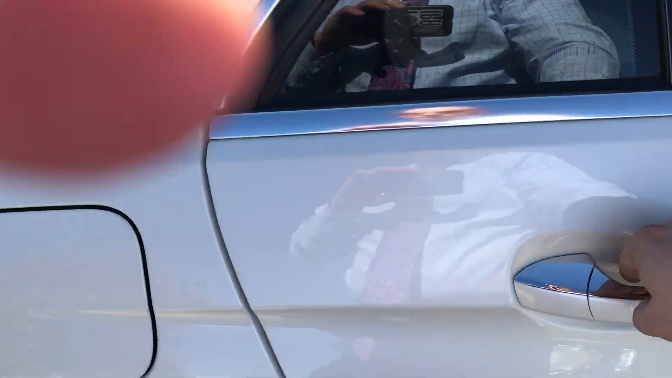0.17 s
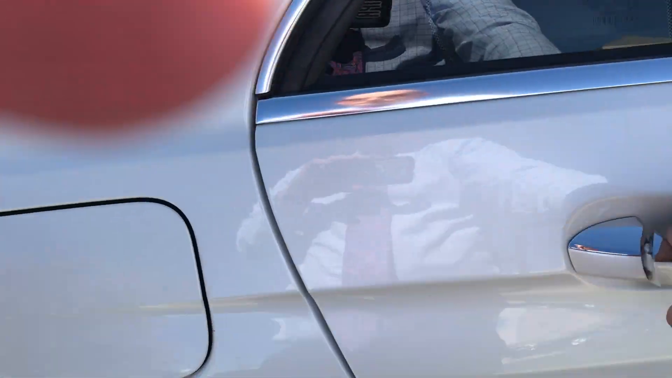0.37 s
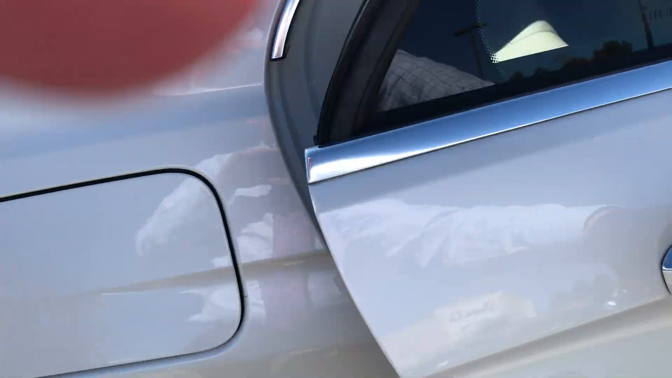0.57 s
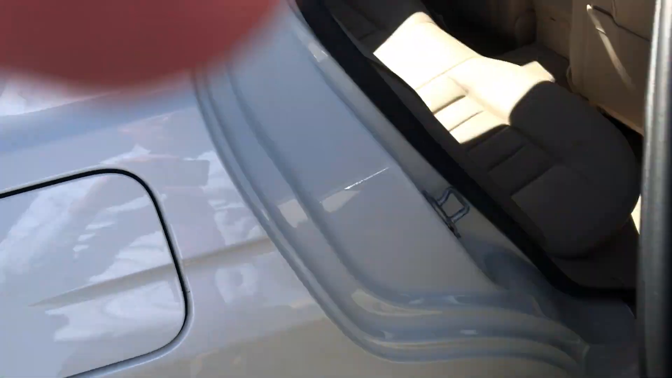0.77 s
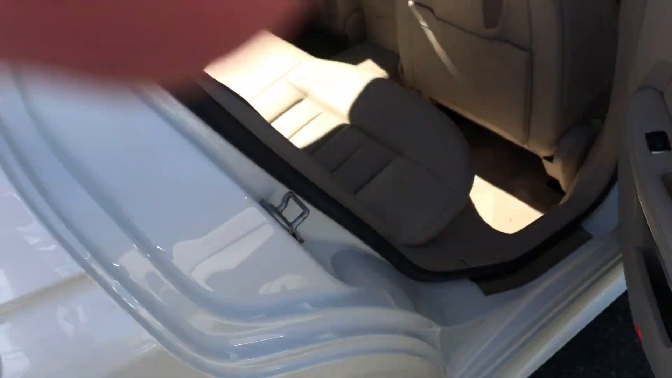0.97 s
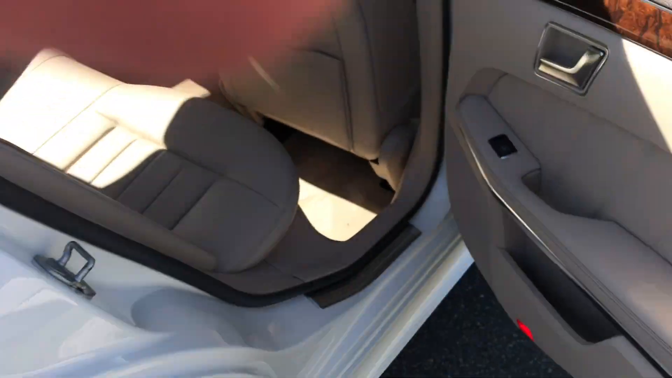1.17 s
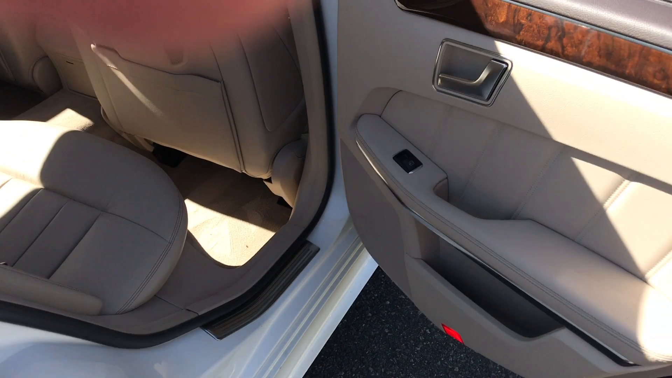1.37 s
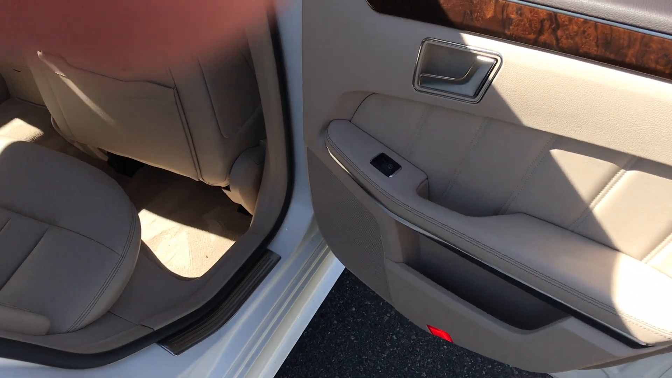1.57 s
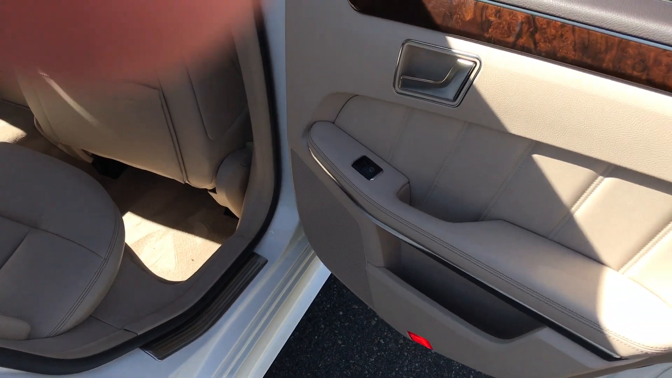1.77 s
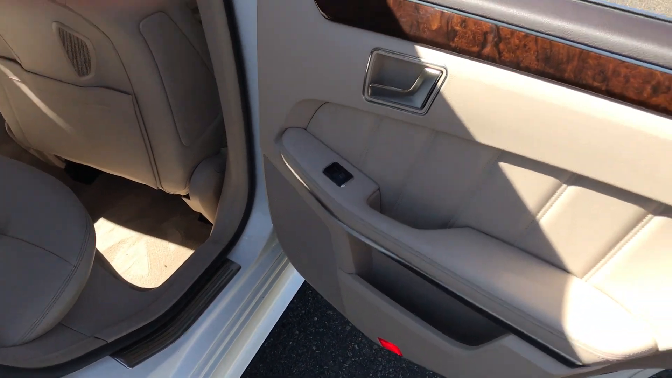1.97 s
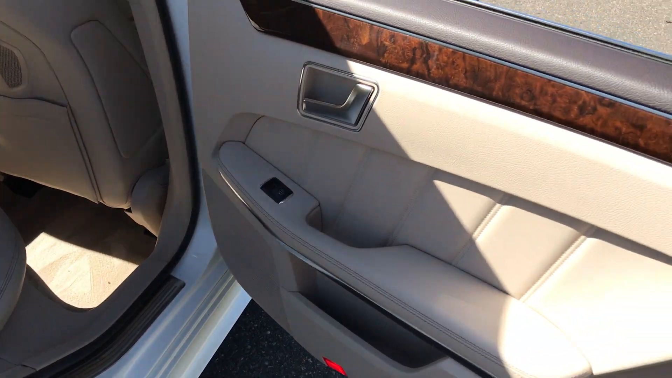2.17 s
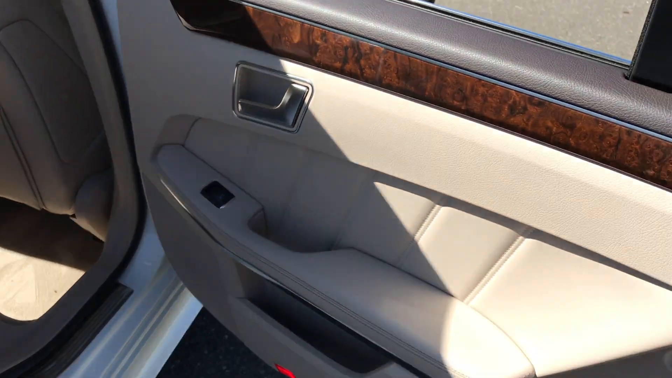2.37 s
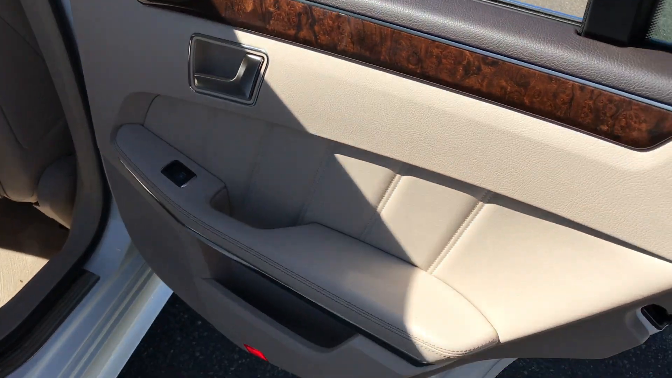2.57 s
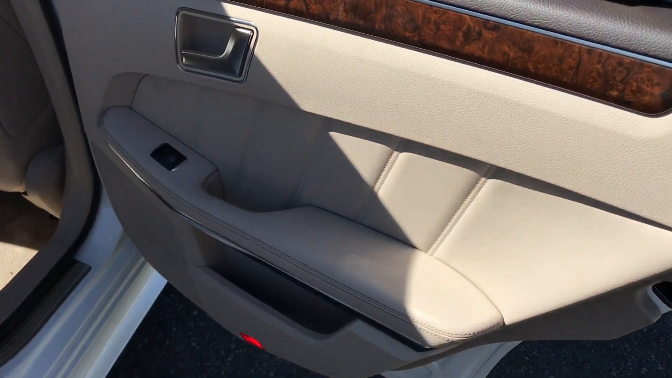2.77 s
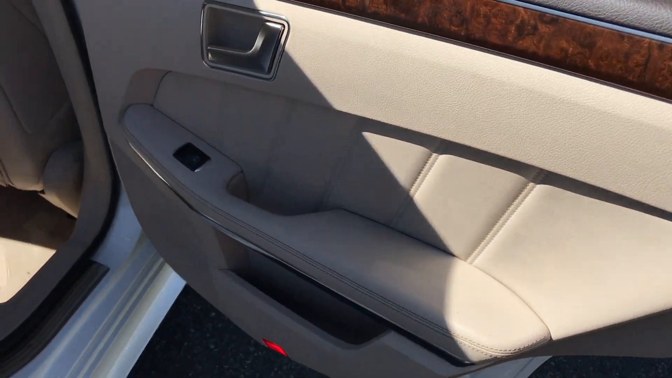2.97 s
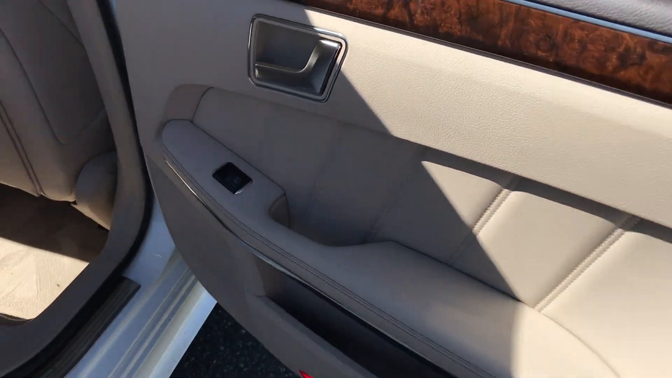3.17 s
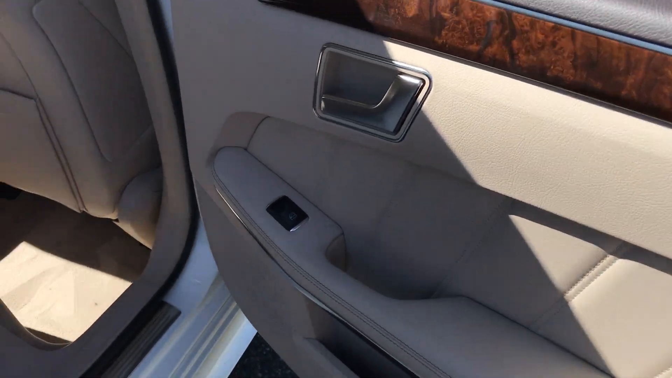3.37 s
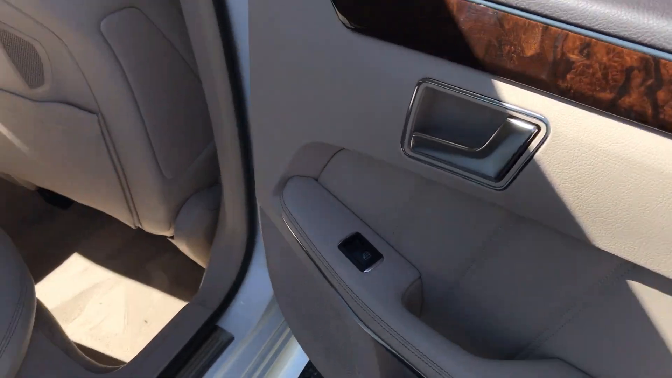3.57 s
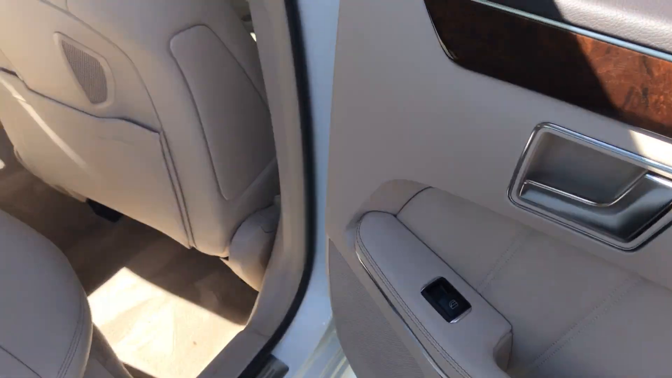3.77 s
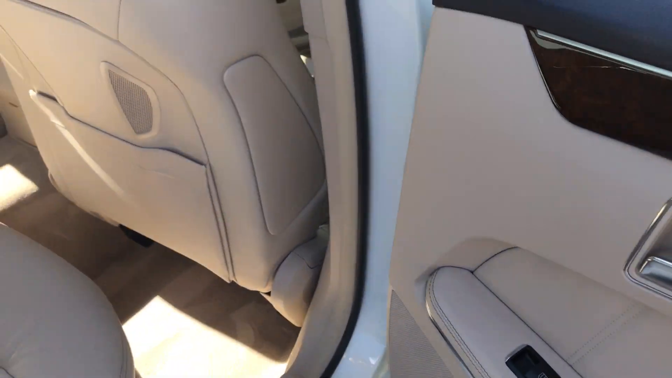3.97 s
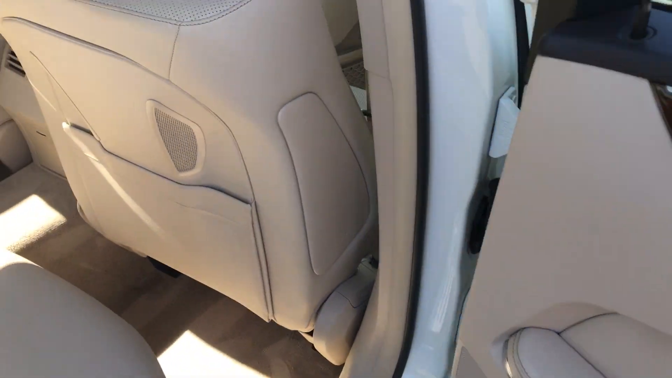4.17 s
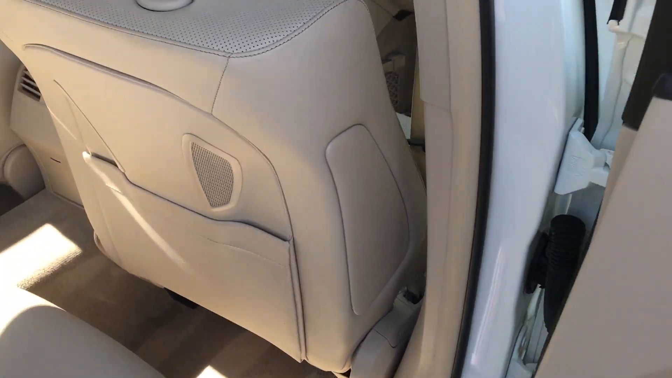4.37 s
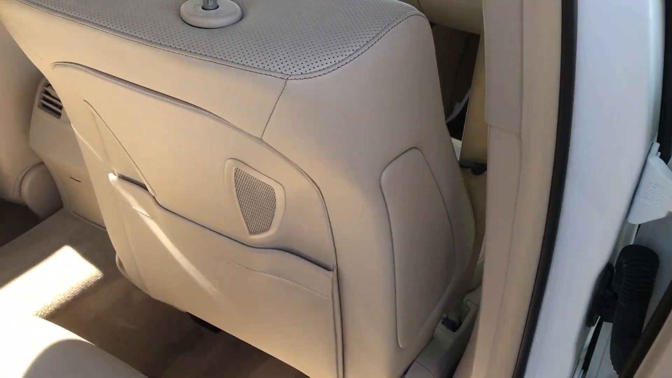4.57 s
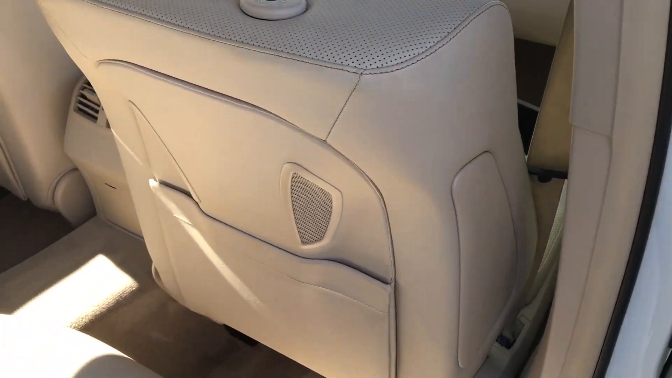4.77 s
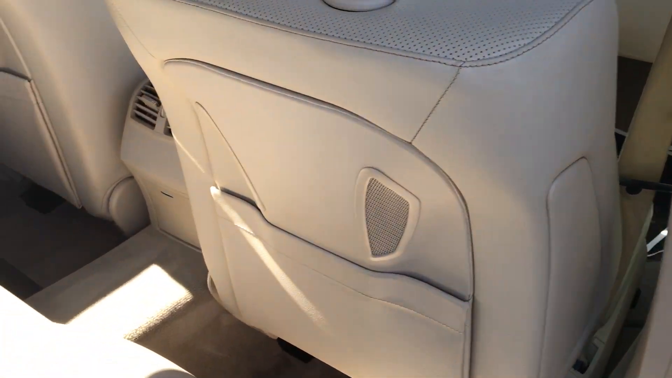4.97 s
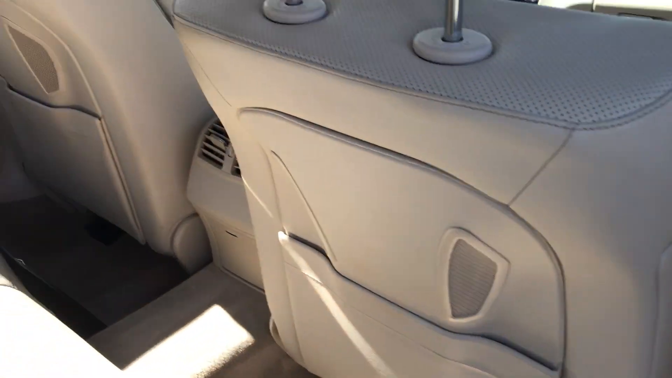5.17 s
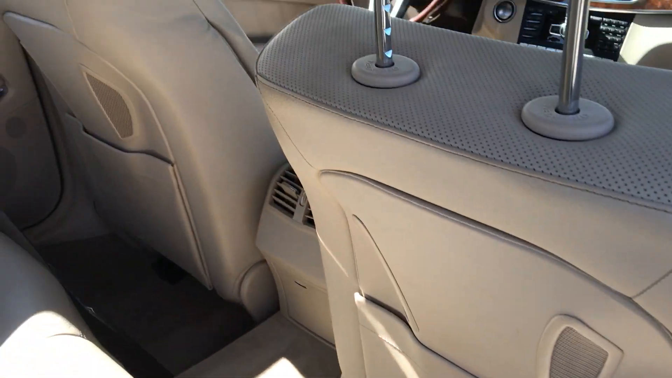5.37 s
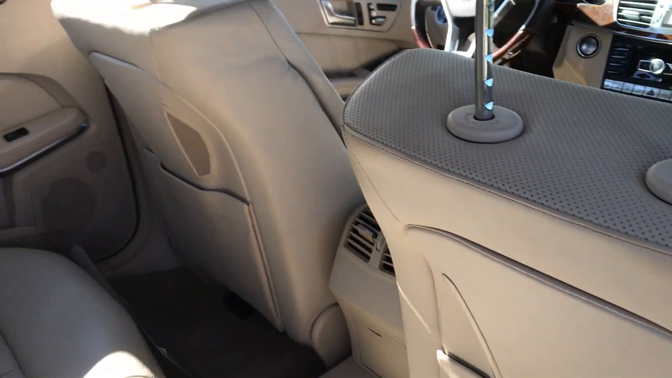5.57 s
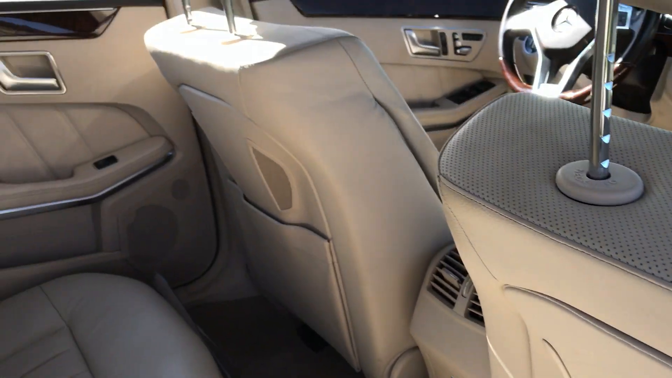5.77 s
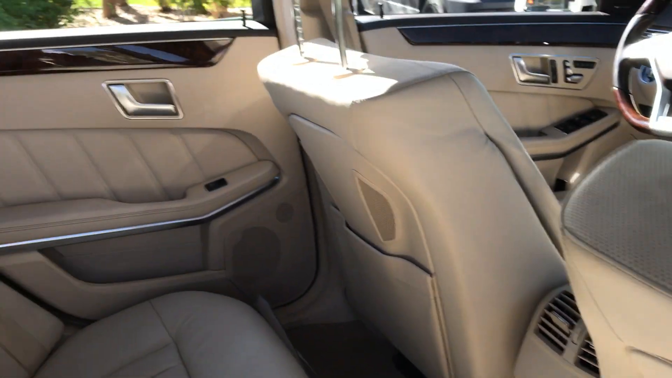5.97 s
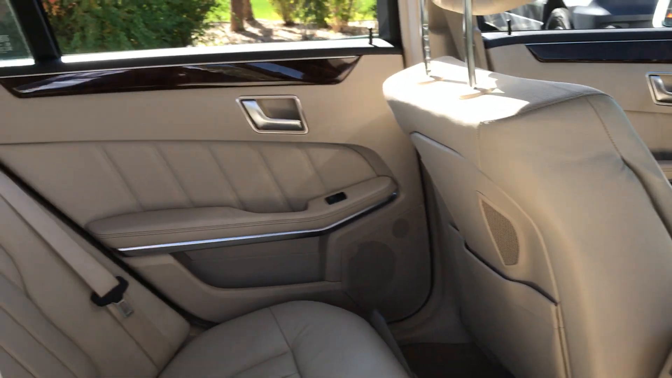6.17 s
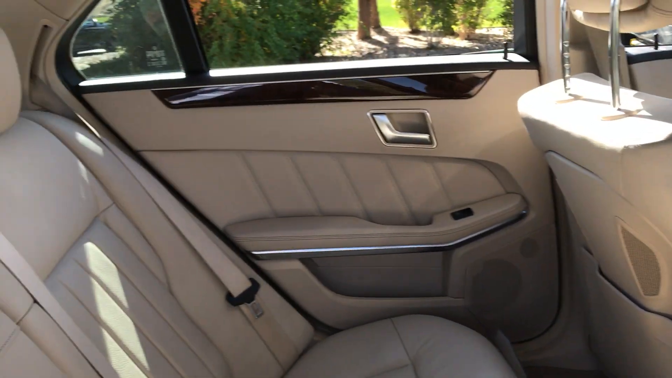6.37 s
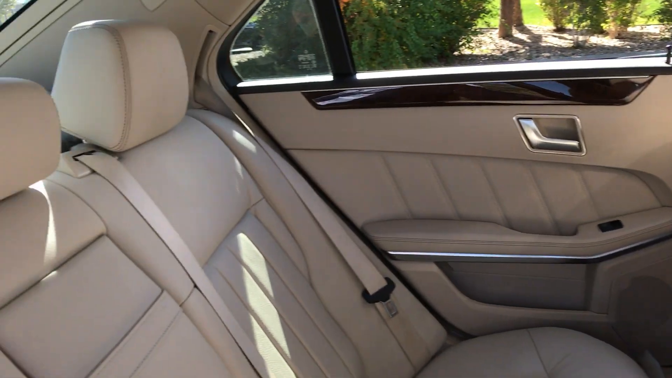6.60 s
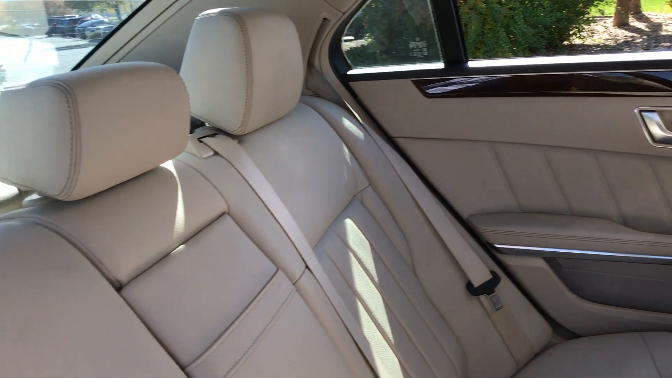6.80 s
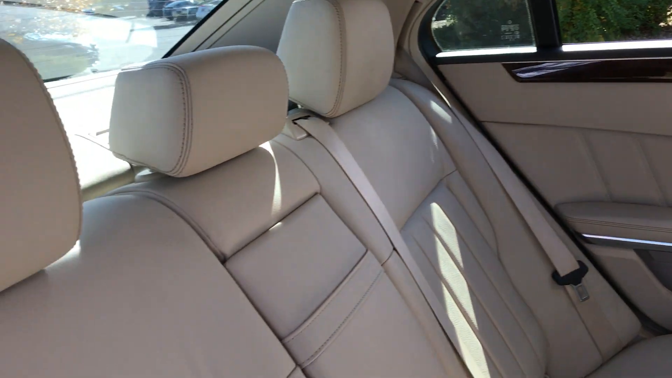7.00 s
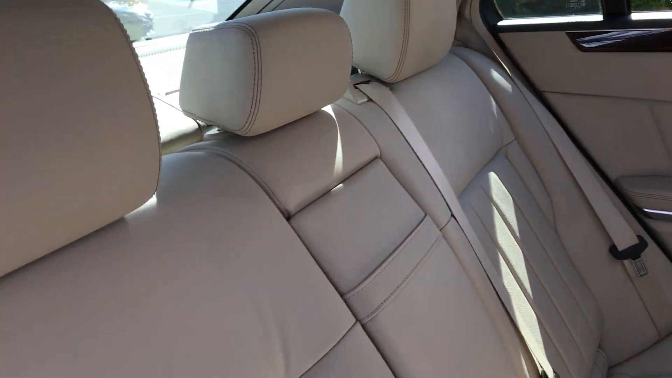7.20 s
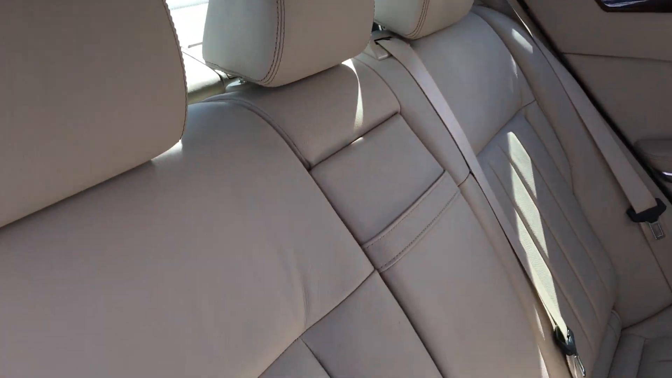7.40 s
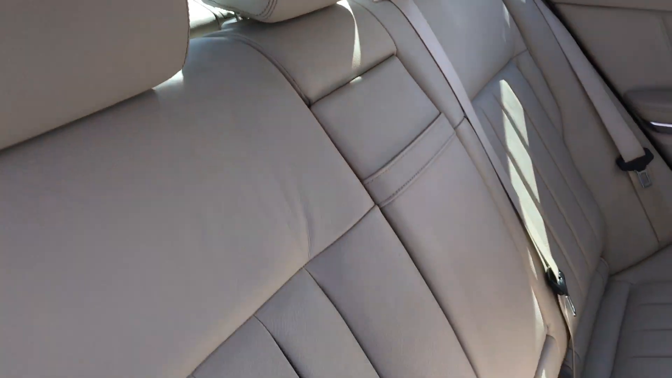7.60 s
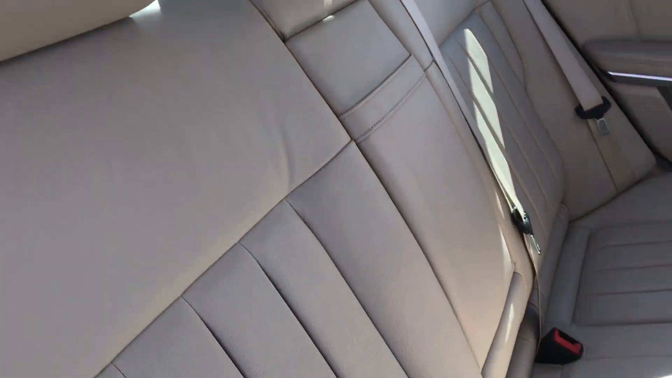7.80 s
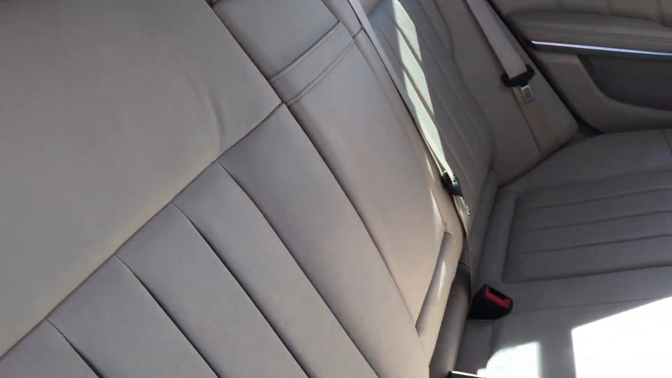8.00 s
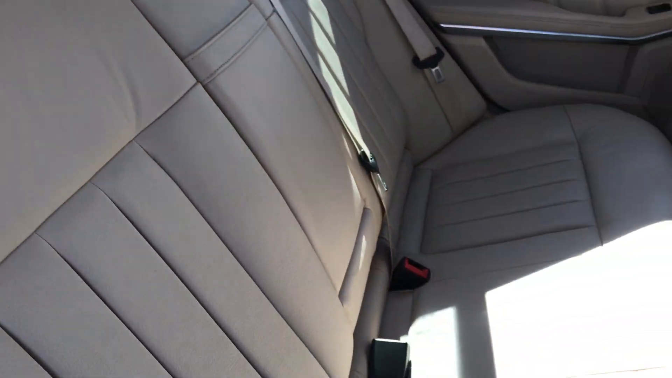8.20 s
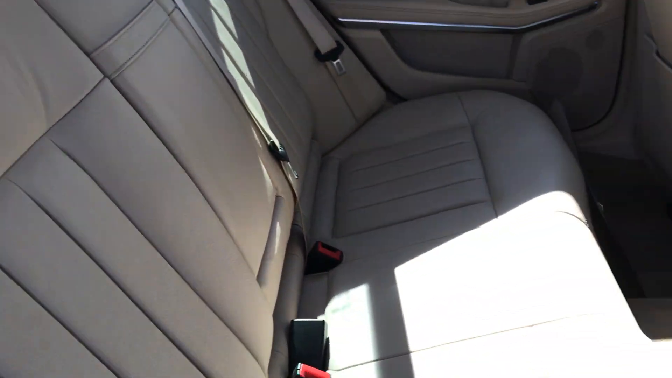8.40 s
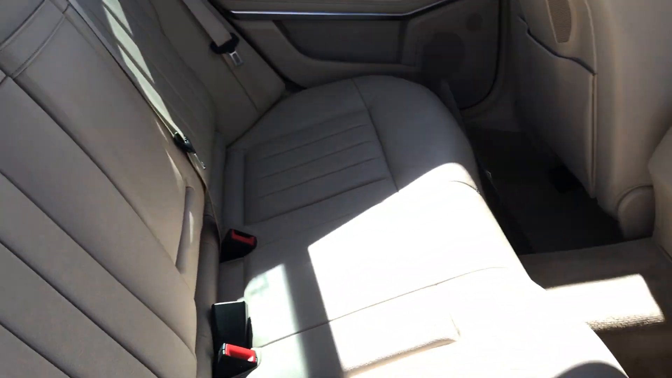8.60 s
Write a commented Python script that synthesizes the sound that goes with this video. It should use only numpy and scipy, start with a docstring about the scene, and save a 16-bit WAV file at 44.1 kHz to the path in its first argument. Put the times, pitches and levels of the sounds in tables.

```python
"""A car idles (40 Hz hum of engine orders, valve ticks and bay hiss) over traffic rumble of coloured noise.
A door is unlatched and swung open beside a hand-held microphone: noise rattles ring latch and panel modes.
Shoes and clothes scuff as noise bursts; the check strap's stop and later bumps thud as damped sines. Far off
a truck pulls away in two gears (unsteady sines). As the microphone moves into the cabin the treble sinks; a sole
squeaks (damped sines), a second far engine swells and fades, and a loud click of two noise bursts closes."""
import sys
import numpy as np
from scipy import signal
from scipy.fft import rfft, irfft, next_fast_len
from scipy.io import wavfile
from scipy.ndimage import uniform_filter1d, map_coordinates

SR = 44100
rng = np.random.default_rng(int(sys.argv[2]) if len(sys.argv) > 2 else 0)


def gain_from_decibels(decibels):
    """Convert decibel values to linear amplitude factors."""
    exponent = np.asarray(decibels, float) / 20
    return 10 ** exponent


def transcribe(u):
    """Save the signal u as a 16-bit wav file named by the first command-line argument.

    u: samples, shape (n,) or (channels, n), limited to [-1, 1]; the rate is SR.
    q: integer samples, one column per channel.
    """
    v = np.clip(np.atleast_2d(u).T, -1, 1)
    q = np.round(v * 32767).astype(np.int16)
    wavfile.write(sys.argv[1], SR, q)


N = 381244  # samples


def unit(x):
    """Scale to rms 1."""
    return x / np.sqrt(np.mean(x ** 2) + 1e-20)


def curves(rows, left=None):
    """Interpolate each column after the time to one value per sample."""
    time_s, *columns = np.transpose(rows)
    return [np.interp(np.arange(N) / SR, time_s, column, left=left) for column in columns]


def wobble(knots_per_s):
    """Smooth random curve through normal knots."""
    knots = rng.standard_normal(int(N * knots_per_s / SR) + 4)
    return map_coordinates(knots, [np.arange(N) * knots_per_s / SR])


def filtered(x, response):
    """Filter x by a complex response of frequency."""
    size = next_fast_len(len(x) + SR // 2)
    spectrum = rfft(x, size) * response(np.fft.rfftfreq(size, 1 / SR))
    return irfft(spectrum, size)[:len(x)]


def colour(points):
    """Gain response through (frequency [Hz], gain [dB]) points on a log frequency axis."""
    point_hz, db = np.transpose(points)
    return lambda hz: gain_from_decibels(np.interp(np.log(hz + 1), np.log(point_hz + 1), db))


def resonances(modes):
    """Causal response of a bank of second-order modes with alternating signs."""
    def response(f):
        total = 0
        for k, (centre_hz, width_hz, db) in enumerate(modes):
            damping = 1j * f * width_hz
            total = total + (-1) ** k * gain_from_decibels(db) * damping / (centre_hz ** 2 - f ** 2 + damping)
        return total
    return response


def rush(spectrum, patchy_db):
    """Coloured noise of rms 1 with time-frequency patches of random gain."""
    z = signal.stft(rng.standard_normal(N + 512), nperseg=512)[2]
    field = uniform_filter1d(rng.standard_normal(z.shape), size=5, axis=0)
    field = uniform_filter1d(field, size=12, axis=1)
    noise = signal.istft(z * gain_from_decibels(patchy_db * unit(field)), nperseg=512)[1][:N]
    return unit(filtered(noise, colour(spectrum)))


def engine_orders(hz, orders, jitter_hz, flutter_db):
    """Sines at multiples of one unsteady rate, each with its own level flutter."""
    phase = 2 * np.pi * np.cumsum(hz + jitter_hz * wobble(6.7)) / SR
    total = 0
    for multiple, db in orders:
        total = total + np.sqrt(2) * gain_from_decibels(db + flutter_db * wobble(7)) * np.sin(multiple * phase)
    return total


def pings(rows, attack_s, order=1):
    """Damped sines from (time [s], level [dB], Hz, cycles) rows; order 2 holds, then stops short."""
    out, t = np.zeros(N + SR), np.arange(SR // 4) / SR
    for time_s, db, hz, cycles in rows:
        fade = np.exp(-(t * hz / cycles) ** order) * (1 - np.exp(-t / attack_s))
        out[round(time_s * SR):][:len(t)] += gain_from_decibels(db) * fade * np.sin(2 * np.pi * hz * t)
    return out[:N]


# microphone position: (time [s], share inside the cabin [0-1])
INSIDE = [(0, 0), (3, 0), (4, 0.23), (5.3, 0.67), (6.1, 0.87), (7.4, 0.92), (8.1, 0.68), (8.64, 0.65)]


def sheltered(outside_db, inside_db):
    """Level curve in dB, blended by how far the microphone is inside the cabin."""
    return outside_db + (inside_db - outside_db) * curves(INSIDE)[0]


# hum: (multiple of tick rate, level [dB])
IDLE_ORDERS = [(2, 1.5), (1.5, -11.5), (2.5, -7), (4, -6)]
# engine-bay hiss spectrum: (frequency [Hz], relative density [dB per Hz])
BAY = [(1100, -23), (1800, -4.5), (2500, 0), (3600, 2.5), (4700, -5.5), (6500, -4), (7500, -14),
       (9000, -15.5), (12000, -52)]
# valve-gear modes: (frequency [Hz], width [Hz], gain [dB])
VALVES = [(2070, 51, -4), (2710, 60, -8), (2897, 38, 4.5), (3080, 40, 0), (3200, 30, 0.5), (3613, 41, 3.5),
          (5130, 170, -9), (6160, 400, -17)]
# mode that answers each tick most sharply: (frequency [Hz], width [Hz], gain [dB])
TAPPET = [(4213, 120, 0)]
# blurred pair of fan tones: (frequency [Hz], width [Hz], gain [dB])
FAN = [(617, 11, -1.5), (641, 9, 0)]


def idle():
    """Low orders hum; once a firing a noise burst rings the valve gear, over bay hiss and fan tones."""
    tick_hz, first_tick_s, tick_decay_s = 20.07, 0.043, 0.021
    hiss_gain = gain_from_decibels(sheltered(-58.5, -70))
    orders = engine_orders(np.full(N, tick_hz), IDLE_ORDERS, jitter_hz=0.097, flutter_db=1.8)
    hum = gain_from_decibels(sheltered(-48, -40.5)) * orders

    since = (np.arange(N) / SR - first_tick_s) * tick_hz  # in ticks
    size = gain_from_decibels(1.6 * rng.standard_normal(int(N / SR * tick_hz) + 3))
    tick = size[np.floor(since).astype(int) + 1] * np.exp(-(since % 1) / tick_hz / tick_decay_s)
    a, b = rng.standard_normal((2, N))
    # the constant 0.24 keeps the metal ringing between ticks
    ringing = filtered(unit((0.24 + tick) * a), lambda f: resonances(VALVES)(f) / (1 + (f / 7500) ** 8))
    sharp = filtered(unit(tick ** 2 * b), resonances(TAPPET))
    ticks = unit(ringing + sharp)

    fan = gain_from_decibels(-2) * unit(filtered(rng.standard_normal(N), resonances(FAN)))
    return hum + hiss_gain * (fan + rush(BAY, patchy_db=1.6) + gain_from_decibels(-5) * ticks)


# road-noise and top-hiss spectra: (frequency [Hz], relative density [dB per Hz])
RUMBLE = [(15, -31), (28, -3), (50, 4.5), (100, 8), (135, 1.5), (170, -10.5), (250, -56)]
DRONE = [(100, -23.5), (170, -8), (250, -11), (410, -21.5), (550, -54), (800, -62.5)]
ROAR = [(260, -24), (450, -2.5), (620, -2.5), (960, -0.5), (1500, -6.5), (2060, -13.5), (2500, -19),
        (3500, -56)]
HISS = [(3800, -27), (6500, 12), (7800, -36), (9600, 10), (10300, -1), (12700, 11), (15500, -4)]


def traffic():
    """Three layers of coloured road noise and a faint top hiss."""
    rumble = gain_from_decibels(sheltered(-36.5, -39.5)) * rush(RUMBLE, patchy_db=0.8)
    drone = gain_from_decibels(sheltered(-48.5, -52.5)) * rush(DRONE, patchy_db=0.45)
    roar = gain_from_decibels(sheltered(-51.5, -58.5)) * rush(ROAR, patchy_db=0.9)
    hiss = gain_from_decibels(sheltered(-75, -85)) * rush(HISS, patchy_db=0.5)
    return rumble + drone + roar + hiss


# rattle inside the door: (frequency [Hz], t60 [s])
CAVITY = [(150, 0.33), (600, 0.24), (1600, 0.15), (3000, 0.16), (8000, 0.1)]


def cavity(x):
    """Loose parts ring on inside the door: a noise tail, each frequency dying at its own speed."""
    hz, t, z = signal.stft(rng.standard_normal(SR // 2), SR, nperseg=256)
    table_hz, table_t60_s = np.transpose(CAVITY)
    t60_s = np.interp(hz, table_hz, table_t60_s)[:, None]
    tail = signal.istft(z * gain_from_decibels(-60 * t / t60_s), SR, nperseg=256)[1]
    return signal.fftconvolve(x, tail / np.linalg.norm(tail))[:len(x)]


# door blows: (time [s], latch drive [dB], panel drive [dB], click drive [dB], rattle t60 [s])
BLOWS = [(.018, -10, -26, -37.5, 0.055), (.023, -2, -16, -29.5, 0.059), (0.0311, -0.5, -1.5, -19.5, 0.056),
         (.0351, 2.5, 1.5, -40, 0.02), (.057, -15, -13, -30.5, .071), (.499, -0.5, -35, -34, .037),
         (0.5014, 3, -9, -38, 0.024), (.529, -18, -13, -44, 0.03), (0.544, -36, -35, -60, 0.12),
         (.574, -24, -21, -56, 0.069), (.67, -29.5, -23.5, -49.5, 0.048), (0.9536, -21, -27, -42, .12),
         (0.9732, -8, -7.5, -30, 0.037), (.985, -16.5, -19, -34.5, .03), (1.003, -30, -26, -38, 0.021)]
# latch and panel modes: (frequency [Hz], width [Hz], gain [dB])
LATCH = [(1170, 94, -3), (1400, 144, 0.5), (1690, 275, 0.5), (2230, 330, -6), (2800, 800, -13),
         (3620, 700, -17.5)]
PANEL = [(162, 25, 0.5), (221, 110, -5), (314, 34, -2), (383, 43, 1), (473, 74, -2), (650, 70, -2),
         (719, 33, -1), (900, 120, -7.5)]
# click spectrum: (frequency [Hz], gain [dB])
CLICK = [(2500, 13), (5000, 4.5), (8000, 2.5), (10500, -6.5), (14000, -6.5)]
# flexing of the whole door: (time [s], level [dB], frequency [Hz], decay [cycles])
PUSHES = [(.039, -11.5, 62, 4.2), (.4995, -16, 92, 1.3), (0.975, -24, 92, 1.5)]


def door():
    """Each blow drives latch and panel modes with a short rattle, plus a click; jolts flex the door."""
    latch, panel, click = np.zeros((3, N + SR))
    t = np.arange(SR // 5) / SR
    for time_s, latch_db, panel_db, click_db, t60_s in BLOWS:
        start = round(time_s * SR)
        at = slice(start, start + len(t))
        fade = gain_from_decibels(-60 * t / t60_s) * (1 - np.exp(-t / 0.00065))
        a, b = rng.standard_normal((2, len(t)))
        latch[at] += gain_from_decibels(latch_db) * fade * (0.83 * a + 4 * np.exp(-t / 0.00035))
        # the soft panel feels one blow plus a little of the rattle
        panel[at] += gain_from_decibels(panel_db) * fade * (1.3 * a - 12 * np.exp(-t / 0.00034))
        click[at] += gain_from_decibels(click_db) * fade * b
    knock = (filtered(latch, resonances(LATCH)) + filtered(panel, resonances(PANEL)))[:N]
    knock = knock + gain_from_decibels(-8.5) * cavity(knock)
    flex = pings(PUSHES, attack_s=0.0031, order=2)
    return knock + flex + filtered(click, colour([(500, -70)] + CLICK))[:N]


# burst spectrum: (frequency [Hz], relative density [dB per Hz])
SCUFF = [(700, 8), (8500, 3.5), (10500, -1), (13000, -0.5), (16000, 1)]
# dry ticks of trim and grit: (time [s], level [dB], low edge [Hz])
TICKS = [(.0835, -39.5, 4000), (.128, -47, 4500), (.1765, -55, 4950), (.812, -47, 5040), (.88, -48, 5070),
         (2.009, -46, 4000), (2.016, -50, 7000), (3.038, -51, 4000), (3.658, -53, 7000)]
# scrapes that start at once, and a loud closing click with a duller body:
# (time [s], level [dB], low edge [Hz], t60 [s])
SCRAPES = [(.461, -49.5, 4000, 0.054), (1.438, -51.5, 7000, 0.082), (2.028, -56.5, 9000, .23),
           (4.756, -55.5, 5000, 0.16), (4.858, -61, 5026, 0.094), (6.249, -61, 5000, .037),
           (7.617, -62, 8500, 0.074), (7.817, -46, 700, 0.044), (7.83, -51.5, 600, .3),
           (1.425, -49, 1300, 0.1), (4.76, -56, 1700, 0.13), (8.594, -25, 4940, 0.08),
           (8.597, -44, 1000, 0.13)]
# cloth rubs that swell first: (time [s], level [dB], low edge [Hz], t60 [s])
RUBS = [(.336, -56, 3000, 0.069), (.391, -56.5, 2970, 0.15), (1.415, -62, 3980, .055),
        (3.04, -62, 6000, 0.084), (4.774, -59, 5000, .07), (4.895, -64, 4930, .06), (7.87, -54, 700, .2),
        (8.22, -60.5, 1800, .24), (8.43, -61, 1800, 0.13)]


def scuffs_and_clicks():
    """Bursts of gritty noise, each with a linear swell and an exponential fade."""
    out, t = np.zeros(N + SR), np.arange(SR // 4) / SR
    rows = [(*row, 0.014, 0.0009) for row in TICKS]  # t60 [s], swell [s]
    rows += [(*row, 0.00089) for row in SCRAPES]
    rows += [(*row, 0.26 * row[-1]) for row in RUBS]
    for time_s, db, low_hz, t60_s, swell_s in rows:
        shape = np.clip(t / swell_s, 0, 1) * gain_from_decibels(-60 * np.clip(t - swell_s, 0, 1) / t60_s)
        grain_db = 2.2 * rng.standard_normal(len(t) // 32 + 1).repeat(32)[:len(t)]
        grit = rng.standard_normal(len(t)) * gain_from_decibels(grain_db)

        def contact(f):
            # a duller contact lowers both band edges
            edges = (1 + (low_hz / (f + 1)) ** 6) * (1 + (f / low_hz / 2.3) ** 4)
            return colour(SCUFF)(f) / np.sqrt(edges)

        out[round(time_s * SR):][:len(t)] += gain_from_decibels(db) * shape * unit(filtered(grit, contact))
    return out[:N]


# padded bumps, the check strap's stop first: (time [s], drive [dB], frequency [Hz])
THUDS = [(1.197, -6, 217), (1.23, -17, 150), (1.271, -16, 190), (3.036, -18, 480), (7.817, -22, 597)]


def thuds():
    """Padded bumps: low sines that die within a fraction of a cycle."""
    return -pings([(*row, 0.36) for row in THUDS], attack_s=0.0017)


# truck, wavering as it draws off: (time [s], level [dB])
TRUCK = [(1.3, -66), (1.45, -32), (2.5, -30), (2.8, -35), (3, -31), (3.4, -39), (3.8, -31.5), (4.1, -39),
         (4.35, -30.5), (4.55, -41), (4.8, -31.5), (5.3, -33.5), (5.5, -43), (8.64, -44)]
# truck orders: (multiple of firing rate, level [dB])
TRUCK_ORDERS = [(1, -3), (.63, -11), (.88, -23), (1.6, -26)]
# even speeding up in each gear: (time [s], firing rate [Hz], rise [Hz per s])
GEARS = [(1.3, 108.2, 13.4), (4.7, 128.6, 5.9)]


def truck():
    """Engine orders rise evenly in each of two gears, with a glide between them."""
    t = np.arange(N) / SR
    glide_s = 0.56
    first, second = (hz + rise * (t - time_s) for time_s, hz, rise in GEARS)
    shifted = np.sin(np.pi / 2 * np.clip(1 + (t - GEARS[1][0]) / glide_s, 0, 1)) ** 2
    firing_hz = first + (second - first) * shifted
    orders = engine_orders(firing_hz, TRUCK_ORDERS, jitter_hz=0.83, flutter_db=2.0)
    return gain_from_decibels(curves(TRUCK, left=-120)[0]) * orders


# chirps of a sole: (time [s], level [dB], frequency [Hz])
SQUEAKS = [(4.758, -38, 1360), (4.776, -41, 1400), (4.8, -46, 1550)]


def squeaks():
    """A sole chirps: sines that die over several cycles."""
    return pings([(*row, 7.6) for row in SQUEAKS], attack_s=0.0014)


# second far engine: (time [s], level [dB])
BUS = [(5.3, -47.5), (6.4, -51), (6.9, -44.5), (8.2, -42), (8.64, -59)]
# its orders: (multiple of base rate, level [dB])
BUS_ORDERS = [(0.98, -1.5), (.906, -4.5)]


def second_engine():
    """Two engine orders creep up in pitch while the level swells and fades."""
    base_hz = 94.2 + 3 * (np.arange(N) / SR - BUS[0][0])  # rises 3 Hz per s
    orders = engine_orders(base_hz, BUS_ORDERS, jitter_hz=0.844, flutter_db=4.0)
    return gain_from_decibels(curves(BUS, left=-120)[0]) * orders


def scene():
    """Sum of all sources at one microphone."""
    steady = idle() + traffic()
    contacts = door() + scuffs_and_clicks() + thuds() + squeaks()
    return (steady + contacts + truck() + second_engine())[None]


def roll_off(x):
    """The treble ends steeply here."""
    return signal.sosfilt(signal.butter(12, 16540, fs=SR, output="sos"), x)


def record(dry):
    """Band limit of the finished mix."""
    top_hz = 15830
    mix = filtered(dry[0], lambda hz: hz < top_hz)[None]
    return roll_off(mix)


dry = scene()
out = record(dry)
transcribe(out)
```